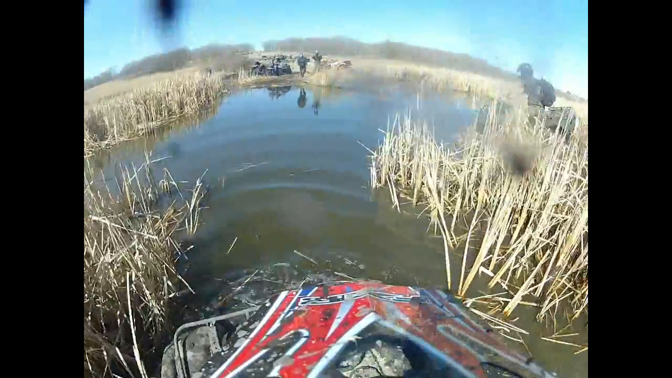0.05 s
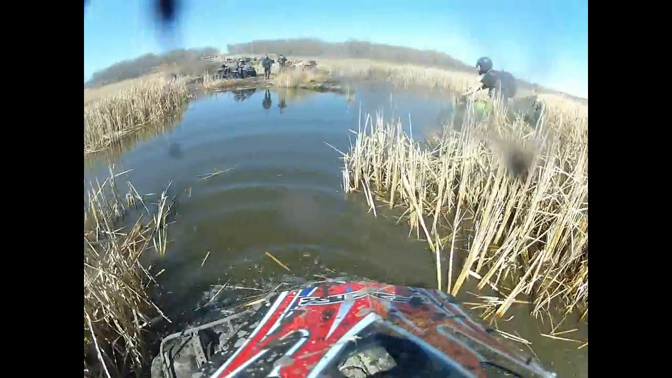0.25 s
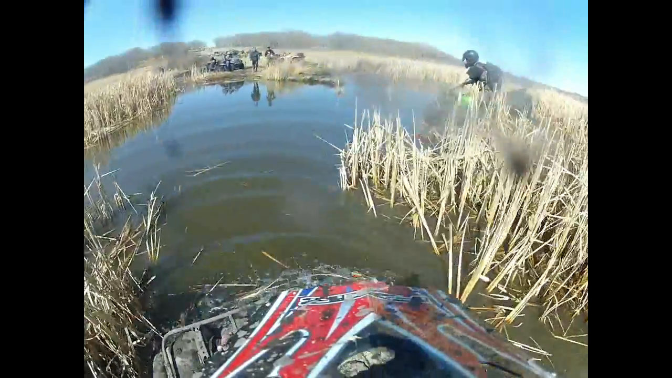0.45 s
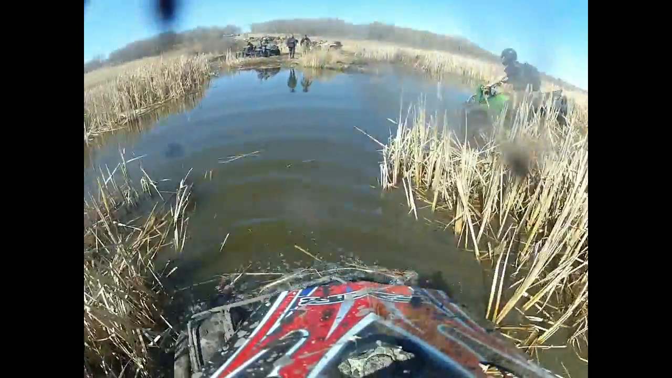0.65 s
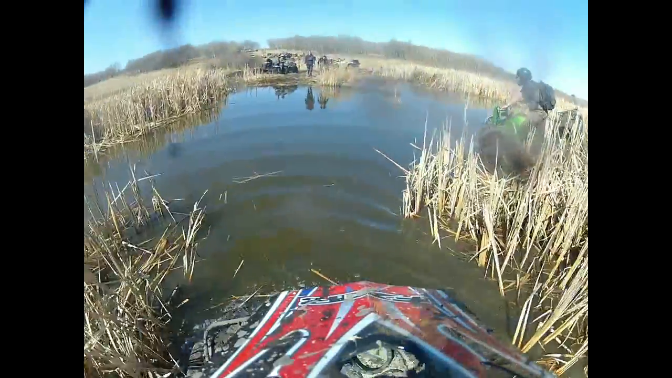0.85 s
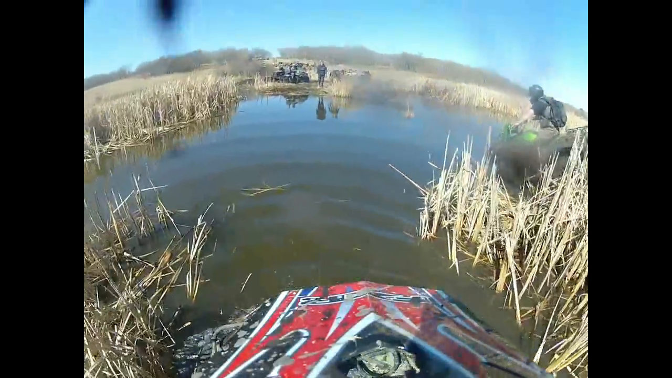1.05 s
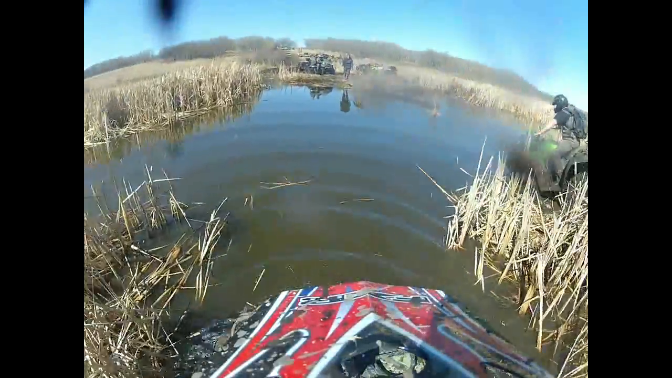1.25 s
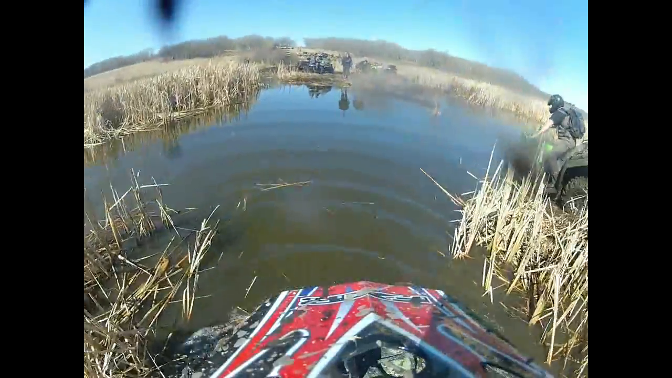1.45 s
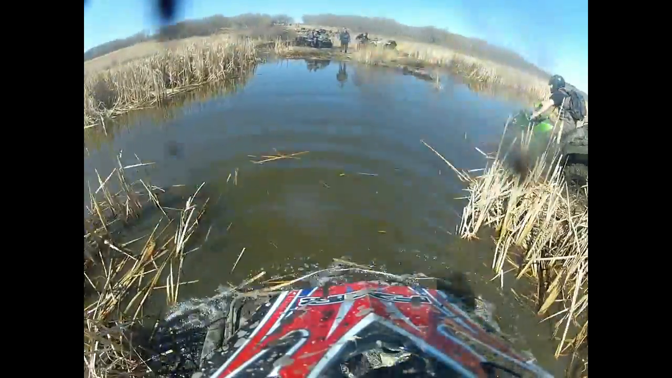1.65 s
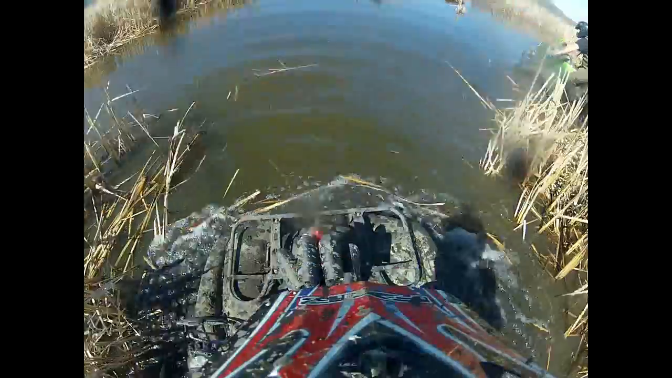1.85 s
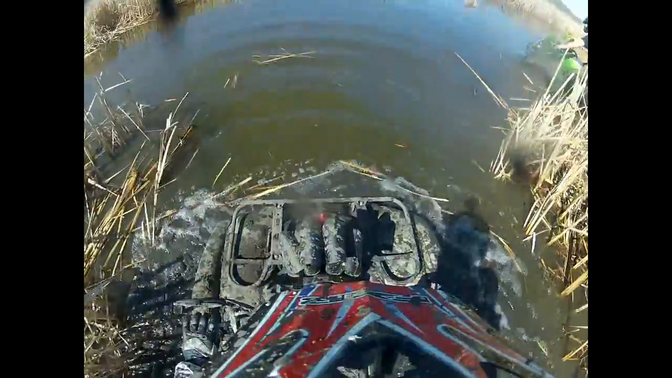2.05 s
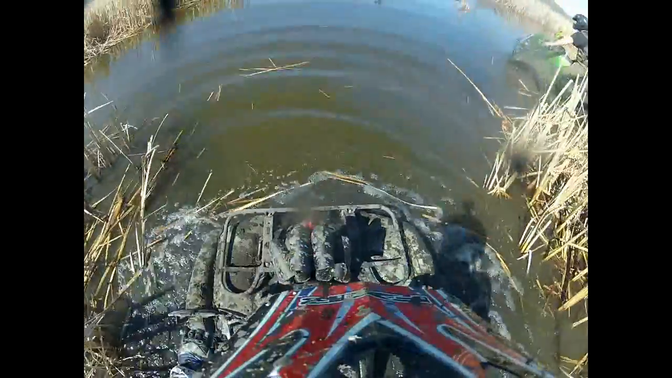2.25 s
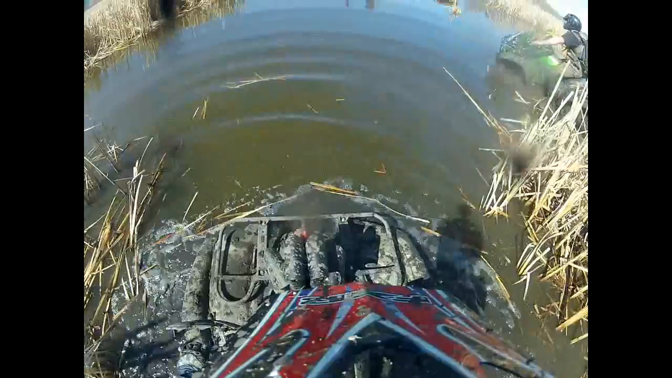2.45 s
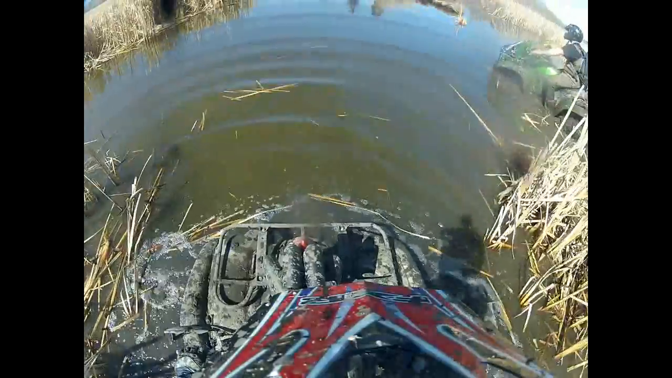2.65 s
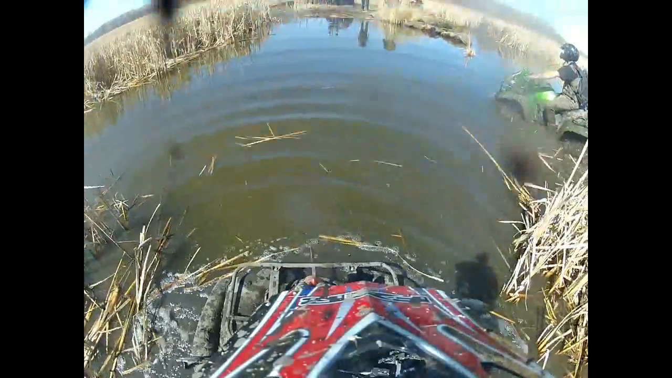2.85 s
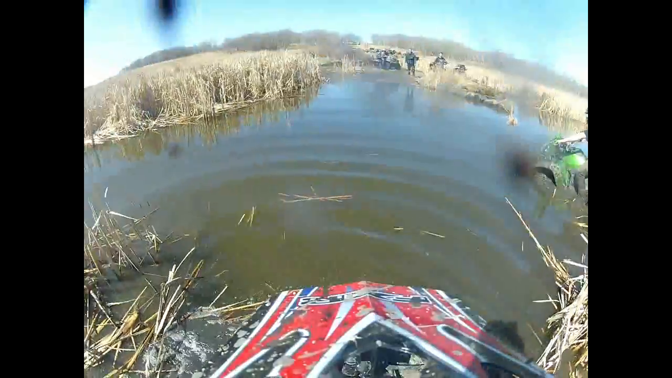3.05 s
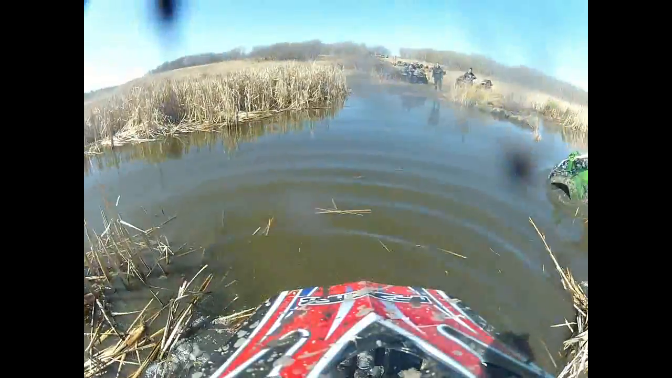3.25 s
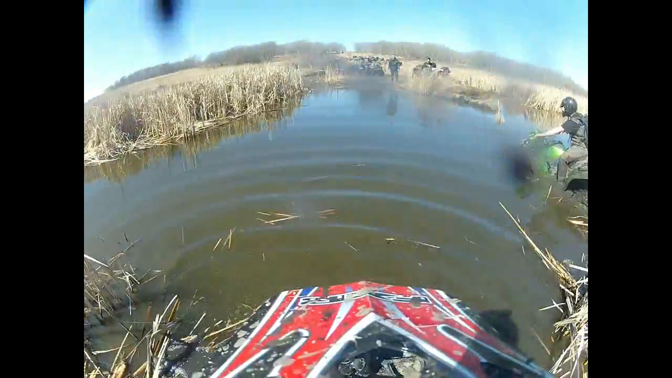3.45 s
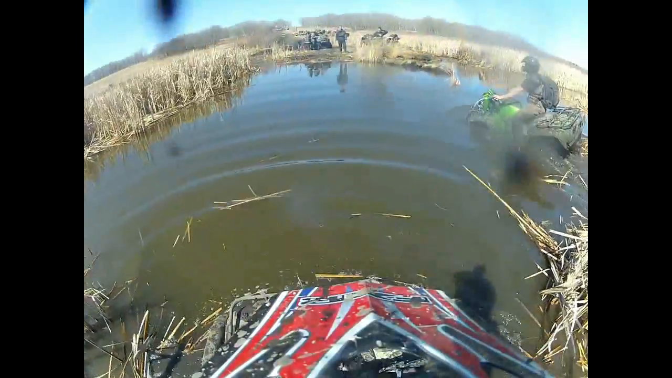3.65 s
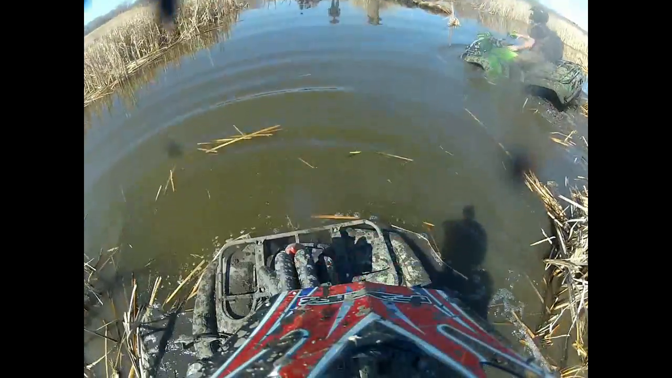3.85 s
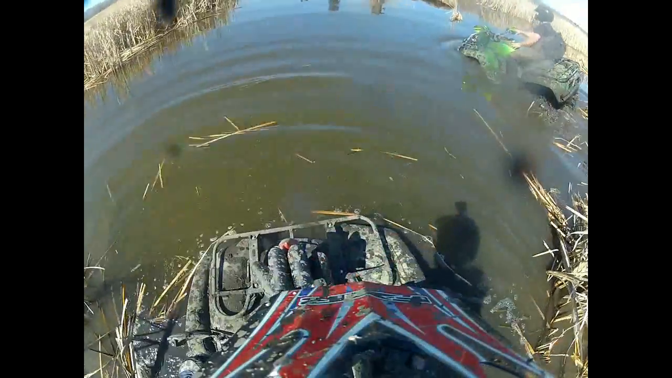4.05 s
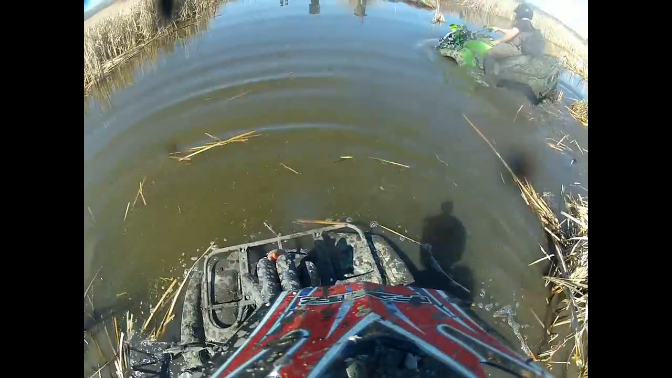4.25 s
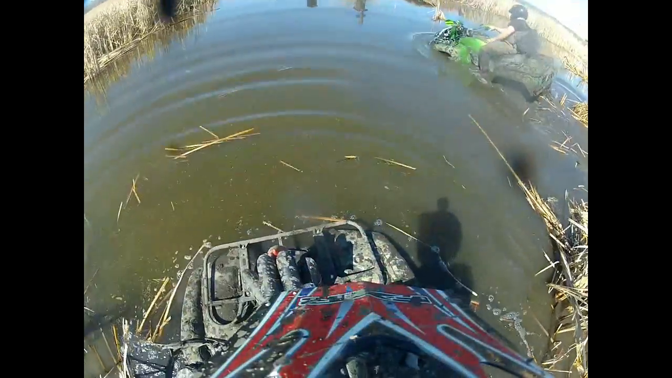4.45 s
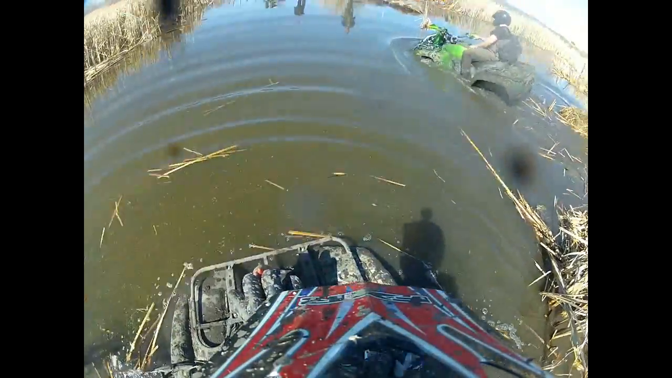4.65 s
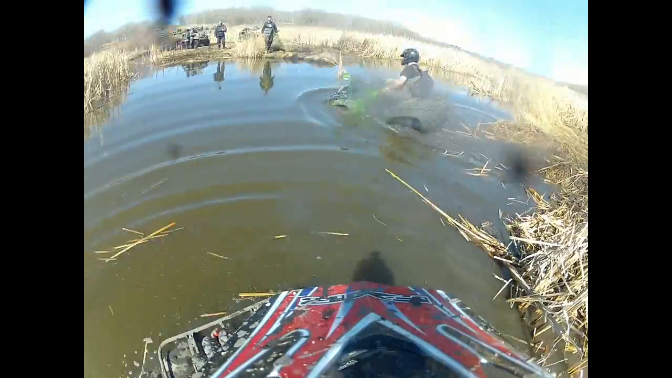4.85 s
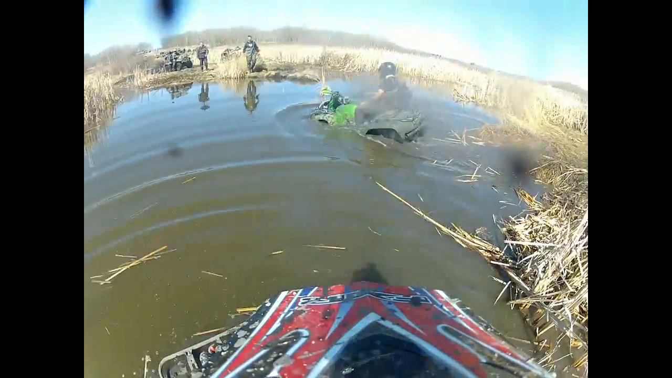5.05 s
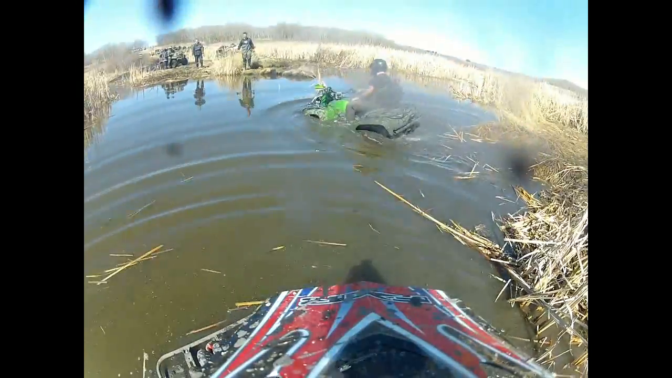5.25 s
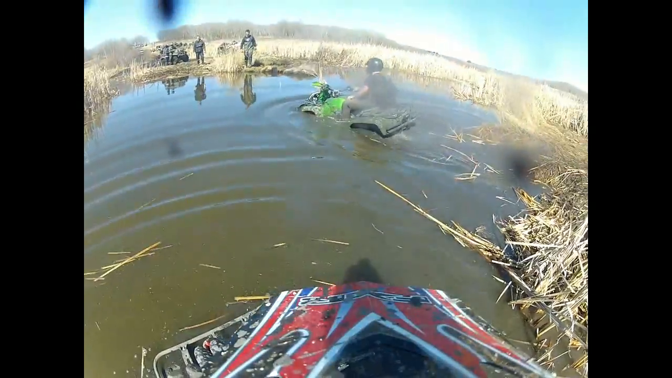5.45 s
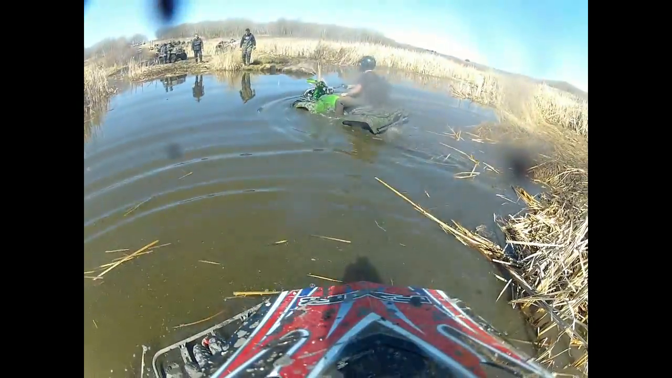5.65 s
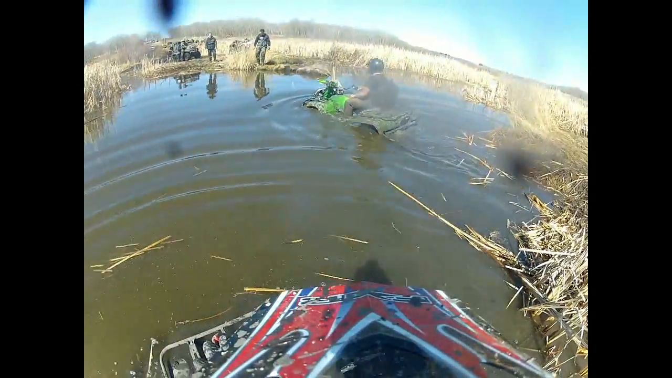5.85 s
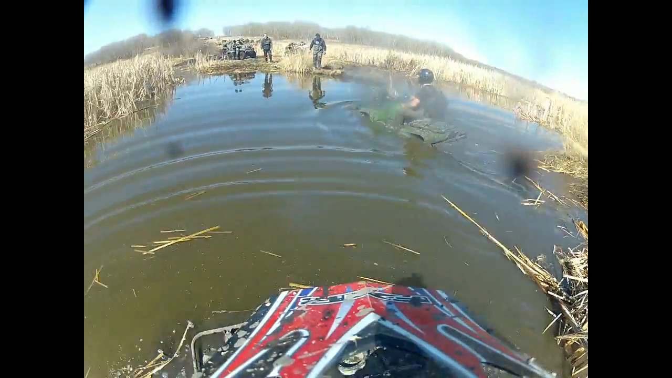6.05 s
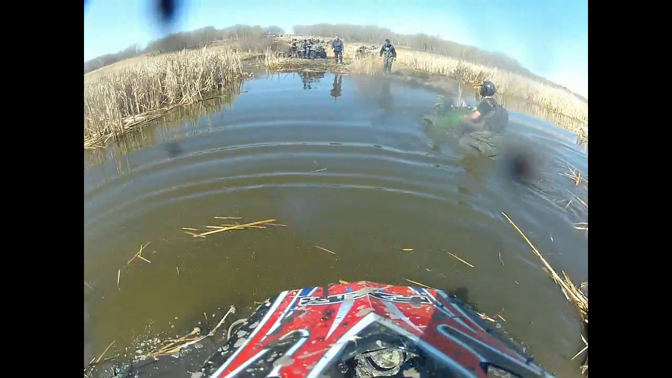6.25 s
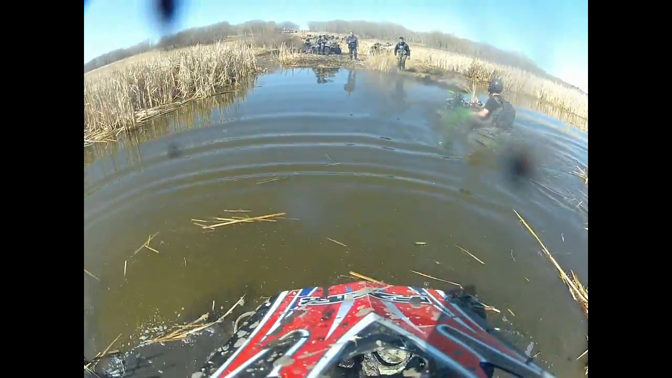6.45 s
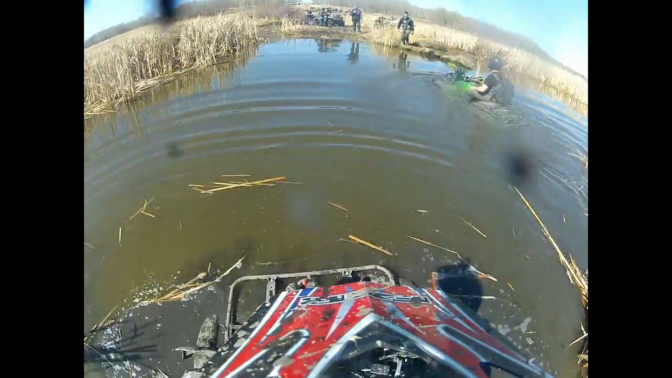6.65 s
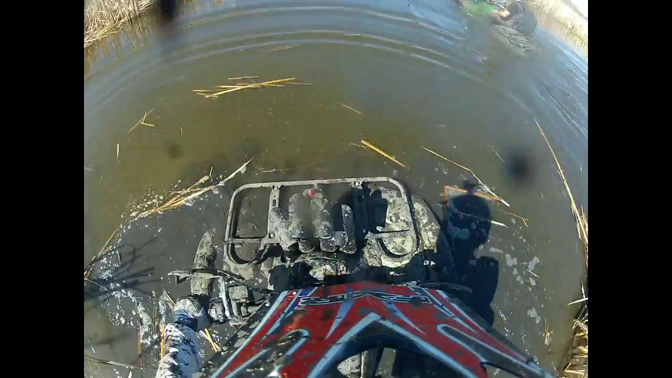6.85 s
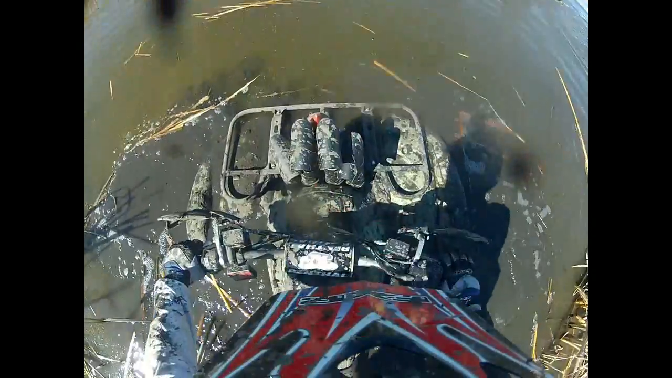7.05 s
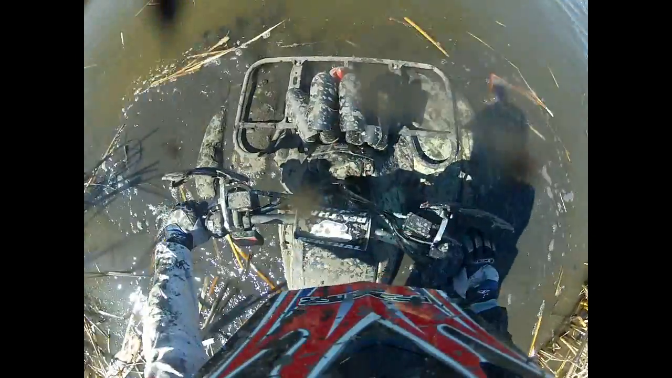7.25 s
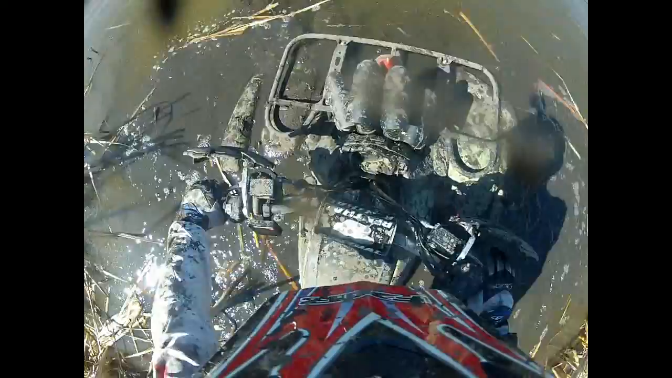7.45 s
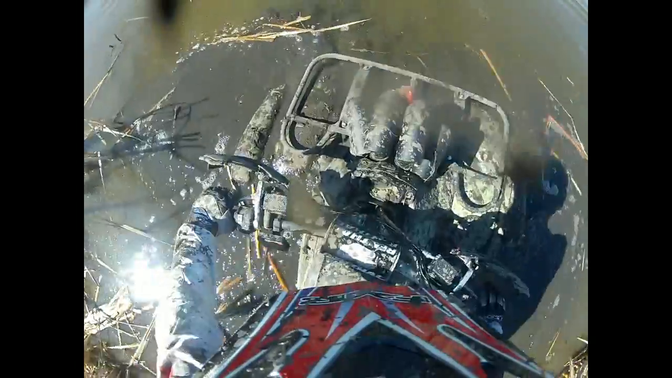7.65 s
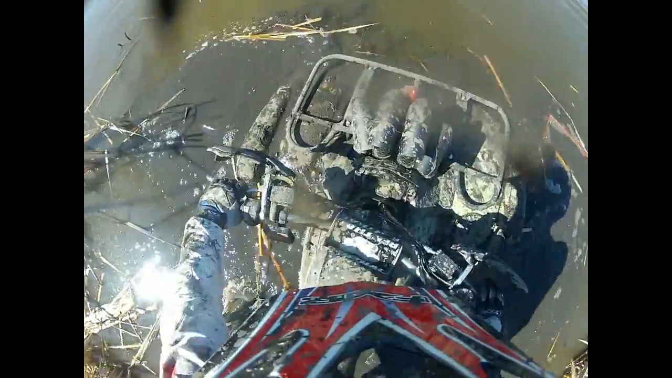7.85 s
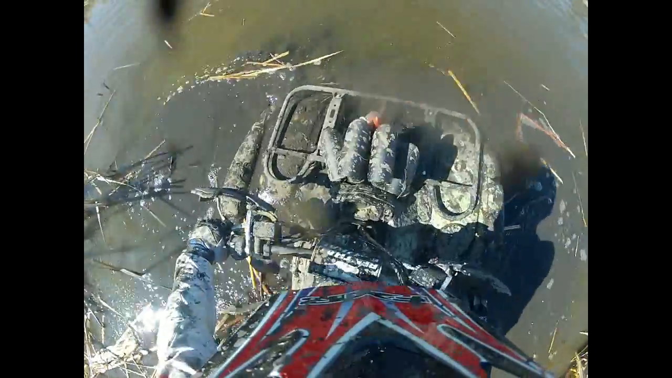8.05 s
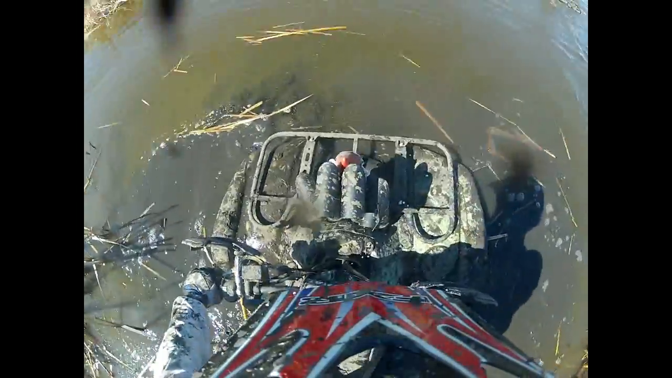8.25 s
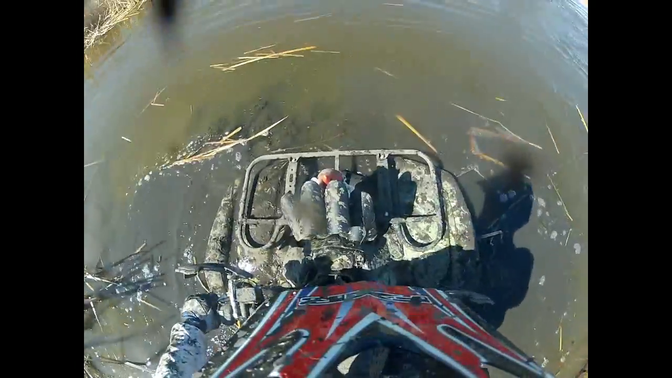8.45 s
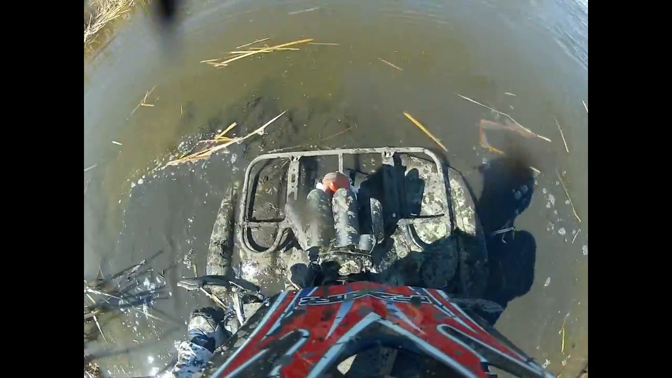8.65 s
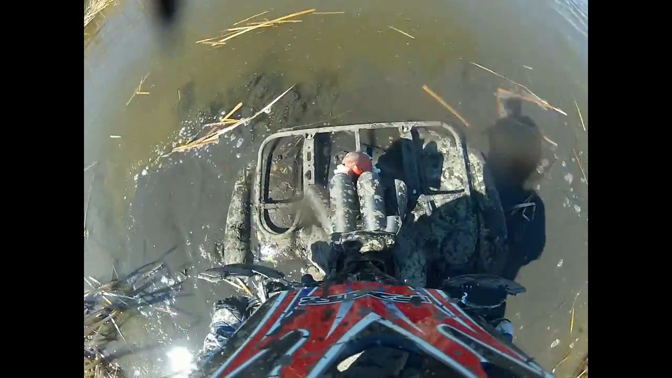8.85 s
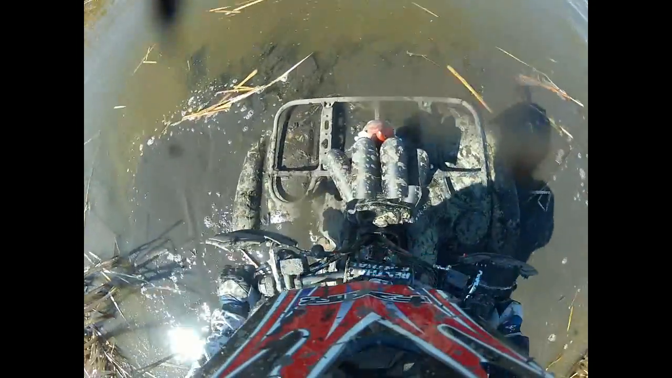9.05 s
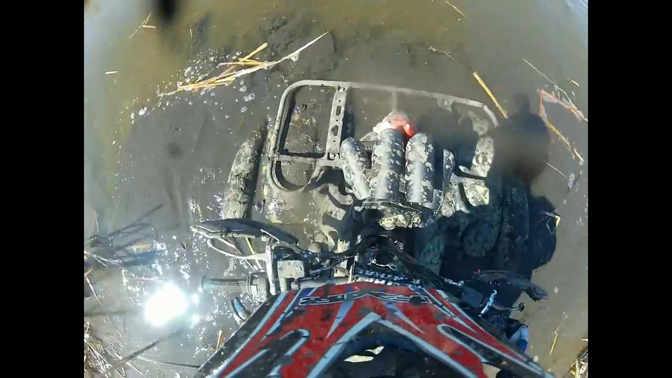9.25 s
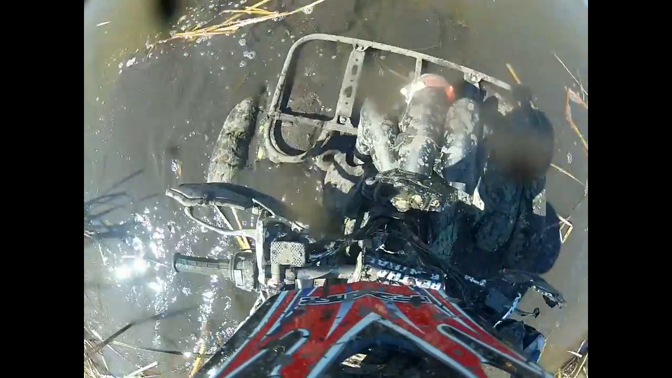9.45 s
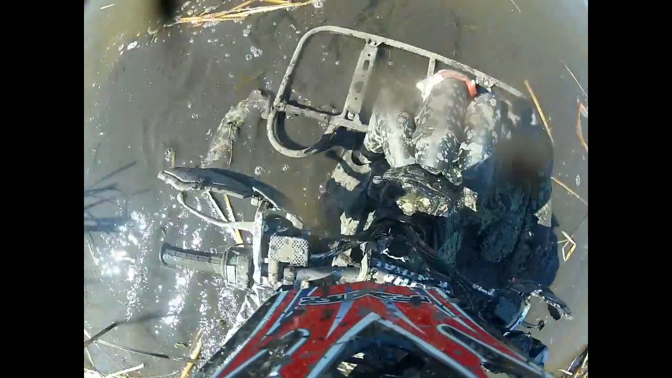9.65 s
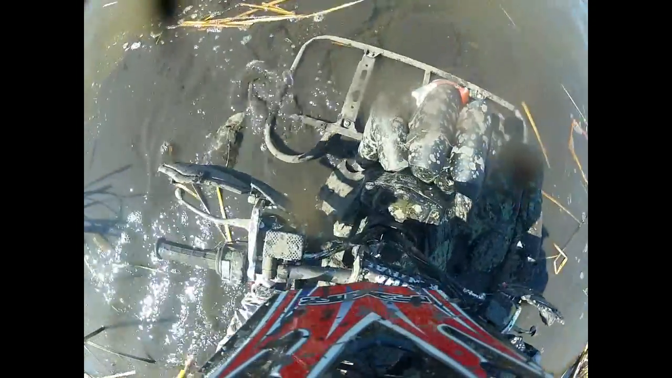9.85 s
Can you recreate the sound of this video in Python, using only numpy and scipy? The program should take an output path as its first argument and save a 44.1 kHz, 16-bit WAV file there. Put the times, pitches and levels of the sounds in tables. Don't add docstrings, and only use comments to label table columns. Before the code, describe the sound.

An off-road engine pops about twenty times a second through a half-flooded exhaust, strongest in the first few seconds, with water hissing and gear clattering. Midway it bogs down to uneven, slow gurgling and metallic ticks, with other engines humming far away. It revs briefly again near the end, amid slaps and soft knocks. The sealed microphone on the rider's helmet sounds muffled and hollow, with gritty treble.

```python
import sys
import numpy as np
from scipy import signal
from scipy.fft import rfft, irfft, next_fast_len
from scipy.io import wavfile
from scipy.ndimage import uniform_filter1d, map_coordinates

SR = 44100
rng = np.random.default_rng(int(sys.argv[2]) if len(sys.argv) > 2 else 0)


def wrap_up_sound(samples):
    columns = np.atleast_2d(samples).T
    tamed = np.clip(columns, -1, 1)
    steps = np.round(tamed * 32767).astype(np.int16)
    wavfile.write(sys.argv[1], SR, steps)


def level_to_linear(level):
    exponent = np.asarray(level, float) / 20
    return 10 ** exponent


N = 436590
DROWNED_DB, DROWNED_BARK_DB = -41, -41.5


def unit(x):
    return x / np.sqrt(np.mean(x ** 2) + 1e-20)


def curves(rows):
    s, *cols = np.transpose(rows)
    return [np.interp(np.arange(N) / SR, s, c) for c in cols]


def wobble(rate, size=1):
    coarse = np.arange(0, N + 96, 96)
    knots = rng.standard_normal(int(N * rate / SR) + 5)
    return np.interp(np.arange(0, N, size), coarse, map_coordinates(knots, [coarse * rate / SR]))


def filtered(x, response):
    m = next_fast_len(N + SR // 2)
    return irfft(rfft(x, m) * response(np.fft.rfftfreq(m, 1 / SR)), m)[:N]


def modes(table, sign=-1):
    def response(f):
        total = 0
        for k, (hz, width, db) in enumerate(table):
            drag = 1j * f * width
            total = total + sign ** k * level_to_linear(db) * drag / (hz * hz - f * f + drag)
        return total
    return response


def coloured(spectrum):
    hz, db = np.transpose(spectrum)
    return unit(filtered(rng.standard_normal(N), lambda f: level_to_linear(np.interp(np.log(f + 1), np.log(hz), db))))


def ringing(drive, table):
    return unit(filtered(drive * rng.standard_normal(N), modes(table)))


def spikes(times, sizes):
    at = np.round(times * SR).astype(int)
    inside = (at >= 0) & (at < N)
    return np.bincount(at[inside], sizes[inside], N)


def dying(x, t60):
    return signal.lfilter([1], [1, -level_to_linear(-60 / (t60 * SR))], x)


def struck(response, blows):
    answer = irfft(response(np.fft.rfftfreq(SR // 2, 1 / SR)))
    return filtered(blows, response) / np.abs(answer).max()


def whistle(hz):
    return np.sin(2 * np.pi * np.cumsum(hz) / SR)


def stack(turns, orders, waver_db):
    step = 10
    slow = 0
    for multiple, db in orders:
        level = level_to_linear(db + waver_db * wobble(3, size=step))
        phase = 2 * np.pi * multiple * turns[::step] + 0.57 * wobble(2.02, size=step)
        slow = slow + level * np.sin(phase)
    return unit(signal.resample_poly(slow, step, 1)[:N])


def drone(rows, orders):
    hz, db = curves(rows)
    return level_to_linear(db + 2.5) * stack(np.cumsum(hz) / SR, orders, waver_db=1.8)


# t/s, firing rate f/Hz, level/dB
NEIGHBOUR_RUN = [(2.6, 30, -70), (3, 30.5, -52), (3.5, 35, -46), (4.1, 35.4, -47), (4.4, 34.6, -48),
                 (4.8, 32.6, -48), (5.5, 33, -48), (5.9, 36, -48), (6.2, 32, -54), (7.5, 32, -62),
                 (8.3, 32.6, -53), (9.1, 32.6, -52), (9.9, 33.5, -52)]
DISTANT_RUN = [(3.6, 31, -70), (4.2, 31.7, -54), (5, 34.6, -50), (5.6, 36.3, -50), (6.3, 37.8, -49),
               (7, 39, -49), (7.6, 40, -50), (8.1, 41, -54), (8.5, 41, -70)]
# multiple of the firing rate, level/dB
NEIGHBOUR_HARMONICS = [(1, -19), (2, -9), (3, 5.5), (4, -2.5), (5, 3.5), (6, -3), (7, -11), (8, 5),
                       (9, -3.5), (10, -3), (11, -5.5)]
DISTANT_HARMONICS = [(1, 2.5), (2, -47), (3, 4.5), (4, -7), (5, -1), (6, -5), (9, -7.5)]


def other_engines():
    return drone(NEIGHBOUR_RUN, NEIGHBOUR_HARMONICS) + drone(DISTANT_RUN, DISTANT_HARMONICS)


def strokes(times, share):
    between = (times[1:] + times[:-1]) / 2
    size = level_to_linear(2.8 * rng.standard_normal((len(between), 2)))
    kicks = spikes(times[:-1], size[:, 0]) + np.clip(share, 0, 1.5) * spikes(between, size[:, 1])
    return unit(uniform_filter1d(dying(kicks, t60=.1), size=400))


# t/s, water level/dB, clatter level/dB
WASH_LEVELS = [(0, -56, -52.5), (1.2, -55, -51.5), (2.8, -55.5, -50.5), (3.6, -61, -57.5), (4, -59, -53.5),
               (5.1, -59.5, -56.5), (5.65, -57.5, -55), (6.05, -62.5, -57.5), (6.4, -60, -56),
               (6.75, -67.5, -60.5), (7.15, -62.5, -56), (7.4, -68.5, -55.5), (7.9, -60.5, -50.5),
               (8.1, -63, -53.5), (8.35, -66, -58), (9.1, -66, -55), (9.6, -60.5, -52), (9.9, -59.5, -50)]
# f/Hz, level/dB per Hz
RUMBLE_SPECTRUM = [(13, -60), (30, -11), (60, -2.5), (110, 1), (200, -4.5), (300, -4), (490, -12),
                   (650, -25), (820, -18.5), (1160, -19.5), (1300, -28), (1450, -34.5), (1850, -39),
                   (3000, -120)]
SPRAY_SPECTRUM = [(1470, -66), (2500, -6.5), (3080, -1.5), (3690, -3.5), (3810, -12), (4060, -11.5),
                  (5370, -13.5), (5900, -11), (7670, -62), (13000, -120)]
# f/Hz, width/Hz, level/dB
CASE_MODES = [(1432, 57, 10), (2143, 112, 21.5), (2980, 73, -29)]


def churn(times):
    water_db, clatter_db = curves(WASH_LEVELS)
    effort_db = load()
    spit = 1.3 * np.exp(-((effort_db - 5.5) / 2.55) ** 2)
    beat = strokes(times + 0.0072, share=.15) * (0.82 + spit)
    rumble = unit((1.3 + 0.37 * beat) * level_to_linear(0.25 * wobble(25)) * coloured(RUMBLE_SPECTRUM))
    rattle_waver = level_to_linear(0.93 * wobble(60) + 1.43 * wobble(7))
    ring = ringing((1 + .55 * beat) * rattle_waver, CASE_MODES)
    spray_waver = level_to_linear(0.75 * wobble(120) + 0.65 * wobble(6.4))
    spray = unit((1 + .75 * beat) * spray_waver * coloured(SPRAY_SPECTRUM))
    rumble_db = -44.5 + 0.5 * (water_db - water_db.mean()) + 0.067 * effort_db
    return level_to_linear(rumble_db) * rumble + level_to_linear(clatter_db) * ring + level_to_linear(water_db) * spray


# t/s, spray peak level/dB, ring level/dB and low level/dB re spray, length/s
SLAP_HITS = [(0.062, -43.5, 4.5, -18, 0.015), (0.413, -44, 1, 5, 0.016), (0.813, -44.5, 3, -12, 0.025),
             (3.436, -48, 7, -4, 0.01), (6.179, -48, -1, -1, 0.014), (6.6245, -69, 27, 23.5, 0.045),
             (6.687, -54.5, -6, 4, 0.043), (6.969, -64.5, 26, 18.5, 0.05), (7.25, -57, 16.5, -7, 0.02),
             (7.291, -55.5, 15.5, -12, 0.02), (8.126, -43, -9, -34, 0.014), (8.238, -47.5, -2, -4, 0.011),
             (9.022, -50.5, 17.5, -6, 0.011), (9.2219, -37.5, -5, -33, 0.011),
             (9.258, -45.5, -3, -14, 0.01), (9.727, -35, -11, -9.5, 0.0058)]
# f/Hz, width/Hz, level/dB
WALL_MODES = [(1380, 160, -8.5), (1860, 43, 6), (2224, 36, 11.5), (2950, 41, -6)]
# f/Hz, width/Hz, level/dB
SHELL_MODES = [(586, 23, -1), (806, 90, 14), (1124, 53, 4.5)]


def slaps():
    spray, ring, low = np.zeros((3, N + SR))
    t = np.arange(SR // 4) / SR
    for s, db, ring_db, low_db, length in SLAP_HITS:
        shape = (1 + 0.92 * np.exp(-t / 0.0073)) * np.exp(-(t / length) ** 2)
        for layer, level_db in ((spray, db), (ring, db + ring_db), (low, db + low_db)):
            layer[round(s * SR):][:len(t)] += level_to_linear(level_db - 7.5) * shape
    wall = ringing(1, WALL_MODES)
    shell = ringing(1, SHELL_MODES)
    return spray[:N] * coloured(SPRAY_SPECTRUM) + ring[:N] * wall + level_to_linear(3.5) * low[:N] * shell


# t/s, peak level/dB, f/Hz, t60/s
HELMET_KNOCKS = [
    (9.023, -24, 79.6, 0.27),
    (9.025, -31, 169, 0.068),
    (9.553, -36.5, 74.7, 0.71),
]


def thuds():
    out, t = np.zeros(N + SR), np.arange(SR // 3) / SR
    for s, db, hz, t60 in HELMET_KNOCKS:
        cycles = hz * (t + 0.0023 * (1 - np.exp(-t / 0.0023)))
        out[round(s * SR):][:len(t)] -= level_to_linear(db - 60 * (t / t60) ** 1.63) * np.sin(2 * np.pi * cycles)
    return out[:N]


# t/s, f/Hz, level/dB
BELT_SQUEAK = [
    (.31, 1840, -75),
    (.335, 1890, -58),
    (.38, 1905, -57.5),
    (.42, 1950, -64),
    (.44, 1960, -80),
]


def belt():
    hz, db = curves(BELT_SQUEAK)
    return level_to_linear(db + 12.5 + 3.0 * wobble(50)) * whistle(hz) * (db > -74)


# t/s, f/Hz, level/dB
GEAR_WHINE = [(8.7, 1105, -77), (8.85, 1108, -64), (9.2, 1110, -82), (9.45, 1112, -69), (9.6, 1115, -56.5),
              (9.9, 1110, -64)]


def gears():
    hz, db = curves(GEAR_WHINE)
    return level_to_linear(db + 3.9 * wobble(28)) * whistle(hz + 6 * wobble(30))


# t/s, firing rate f/Hz
CRANK_SPEED = [(0, 25.681), (0.34, 20.057), (0.42, 26.632), (0.64, 20.656), (0.92, 24.157), (1.22, 15.066),
               (1.7, 21.83), (2.62, 20.967), (3.68, 21.049), (4.24, 11.178), (5.76, 13.578), (6.2, 19.334),
               (6.98, 16.071), (7.14, 24.514), (7.74, 22.082), (7.86, 25.991), (8.32, 21.568),
               (9.93, 19.637)]


def crank():
    speed, = curves(CRANK_SPEED)
    return speed, np.cumsum(speed) / SR - .574


# multiple of the firing rate, level/dB
HUM_HARMONICS = [(1, 5), (2, 3), (3, -5.5), (4, -1), (5, 6), (6, -0.5), (7, -7.5), (8, -16.5), (9, -4),
                 (10, -3.5), (11, -38)]


def hum():
    speed, turns = crank()
    db = -48.5 + 1.5 * (speed - 20) + .25 * load()
    return level_to_linear(db) * stack(turns, HUM_HARMONICS, waver_db=2.6)


# multiple of the firing rate, level/dB
SHUDDER_HARMONICS = [(4, 4), (5, -4), (6, 2), (7, -11), (8, 2), (9, -9), (10, 3), (11, 4)]


def shudder():
    middle_s, half_s = 7.88, 0.28
    bite = np.exp(-((np.arange(N) / SR - middle_s) / half_s) ** 4)
    return level_to_linear(-44.5) * bite * stack(crank()[1], SHUDDER_HARMONICS, waver_db=4.5)


# middle t/s, peak level/dB, half length/s
VALVE_SPELLS = [(0, -41, 0.58), (1.35, -44, .35), (2.945, -37, 0.1), (3.495, -36, 0.32), (4.7, -42.5, 0.56),
                (5.257, -39.5, 0.27), (5.5, -31.5, 0.079), (5.75, -35.5, 0.27), (6.266, -43, 0.17),
                (7.2, -63, 0.11), (9.4, -54, 0.24)]


def valves(times):
    at = np.sort(np.r_[times, (times[1:] + times[:-1]) / 2])
    spell = sum(level_to_linear(db) * np.exp(-((at - s) / half) ** 2) for s, db, half in VALVE_SPELLS)
    burst = dying(spikes(at, spell * level_to_linear(1.1 * rng.standard_normal(len(at)))), t60=.05)
    ring = ringing(burst, CASE_MODES) * np.sqrt(np.mean(burst ** 2))
    return level_to_linear(-10) * ring + level_to_linear(-15.0) * burst * coloured(SPRAY_SPECTRUM)


# start t/s, end t/s, pop level/dB at start and end, bark level/dB re pop
THROTTLE_SPELLS = [
    (0, 0.088, -17, -11, -15),
    (.23, 0.532, -19.5, -10.5, -10),
    (0.713, 0.956, -20.5, -11.5, -9),
    (1.06, 1.27, -28, -30.5, -6),
    (1.312, 2.619, -17, -19.5, -17.5),
    (2.66, 3.79, -23, -26, -9.5),
    (6.96, 7.3, -24, -24.5, -10),
    (7.642, 8.054, -26.5, -31, -10),
    (9.6, 9.922, -30, -30.5, 0),
]


def throttle(t):
    start, end, first_db, last_db, bark_db = np.transpose(THROTTLE_SPELLS)[:, :, None]
    ramp_db = (last_db - first_db) * np.clip((t - start) / (end - start), 0, 1)
    release_db = 110.5 * np.clip(t - end, 0, None)
    db = np.where(t < start, -120, first_db + ramp_db - release_db)
    pop_db = np.maximum(db.max(axis=0), DROWNED_DB)
    return pop_db, np.maximum((db + bark_db).max(axis=0), DROWNED_BARK_DB)


def load():
    t = np.arange(0, N + 100, 100) / SR
    db = uniform_filter1d(throttle(t)[0], size=30)
    return np.interp(np.arange(N) / SR, t, db - db.mean())


# t/s, pop level/dB, bark level/dB re pop
SINGLE_POPS = [(.022, -10, -22), (.147, -22.5, 1.5), (.328, -13, -9.5), (.982, -14, -20), (1.436, -20, -18),
               (1.488, -14.5, -21), (1.64, -22.5, -7), (1.686, -15.5, -18), (1.779, -19.5, -18),
               (1.965, -21.5, -16), (2.335, -20.5, -20), (2.382, -14.5, -36), (2.478, -23.5, -19),
               (2.525, -15, -27), (2.572, -23.5, -20), (2.62, -15.5, -21), (3.431, -23.5, -6),
               (4.141, -30.5, -14), (4.215, -25.5, -18), (4.304, -28, -11.5), (.457, -13.5, -4),
               (5.528, -29.5, -5), (5.956, -28.5, -2.5), (6.455, -30, -3.5), (7.029, -24, -7),
               (7.164, -20, 2.5), (7.33, -24.5, -11), (9.024, -29.5, -18), (9.555, -21.5, -9),
               (9.662, -25.5, -2)]


def firings():
    speed, turns = crank()
    turns = turns + 1
    count = np.arange(int(turns[-1]) + 2)
    times = np.interp(count, turns, np.arange(N) / SR)
    mean_db, bark_db = throttle(times)
    is_open = mean_db > DROWNED_DB
    chance = rng.standard_normal((len(times), 2))
    pop_db = mean_db + np.where(is_open, 1.2, 2.4) * chance[:, 0]
    speed_bark_db = 0.76 * (np.interp(count, turns, speed) - 21)
    bark_db = bark_db + 2.8 * chance[:, 1] + is_open * speed_bark_db
    for s, db, relative_db in SINGLE_POPS:
        k = np.abs(times - s).argmin()
        if mean_db[k] < -29:
            times[k] = s
        pop_db[k], bark_db[k] = db, db + relative_db
    return times, pop_db, bark_db


def muffled(f, edge_hz):
    s = 1j * f / edge_hz
    return 1 / ((s * s + 1.34 * s + 1) * (s * s + 1.2 * s + 1) * (s * s + 1.08 * s + 1))


# f/Hz, width/Hz, level/dB
PIPE_MODES = [(123, 40, -11), (257.8, 21.2, 5), (379.3, 85, -7), (465.5, 9.7, -7.5)]


def pipe(damping):
    table = [(hz, damping * width, db) for hz, width, db in PIPE_MODES]
    return lambda f: modes(table, 1)(f) * muffled(f, edge_hz=457)


def exhaust(times, pop_db, bark_db):
    clear = np.clip((pop_db + 33) / 12, .05, .95)
    pop = level_to_linear(pop_db) * clear
    again = 0.23 * rng.random(len(times))
    pops = spikes(times + 0.00046, pop) + spikes(times + 0.00843, pop * again)
    puff = level_to_linear(pop_db) * np.sqrt(1 - clear ** 2)
    puffs = dying(spikes(times - .003, puff), t60=0.11) * rng.standard_normal(N)
    blast = dying(spikes(times, level_to_linear(bark_db)), t60=0.074) * rng.standard_normal(N)
    blast = blast + spikes(times + 0.00185, level_to_linear(bark_db + 6.5))
    bark = level_to_linear(-31) * struck(modes(SHELL_MODES), blast)
    return struck(pipe(1), pops) + level_to_linear(-26.0) * struck(pipe(2.2), puffs) + bark


def scene():
    times, pop_db, bark_db = firings()
    marsh = other_engines() + churn(times) + slaps() + thuds()
    machine = belt() + gears() + hum() + shudder() + valves(times)
    return (marsh + machine + exhaust(times, pop_db, bark_db))[None]


def roll_off(x):
    return signal.sosfilt(signal.butter(12, 16430, fs=SR, output="sos"), x)


def record(dry):
    hold_hz, top_hz = 12000, 15570
    band = filtered(dry[0], lambda f: f ** 4 / (f ** 4 + 36 ** 4) / (1 + (f / 5600) ** 24))
    comb = 1 + 2 * np.cos(2 * np.pi * hold_hz * np.arange(N) / SR)
    held = filtered(band * comb, lambda f: np.sinc(f / hold_hz) * (f < top_hz))
    return roll_off(held[None])


dry = scene()
out = record(dry)
wrap_up_sound(out)
```